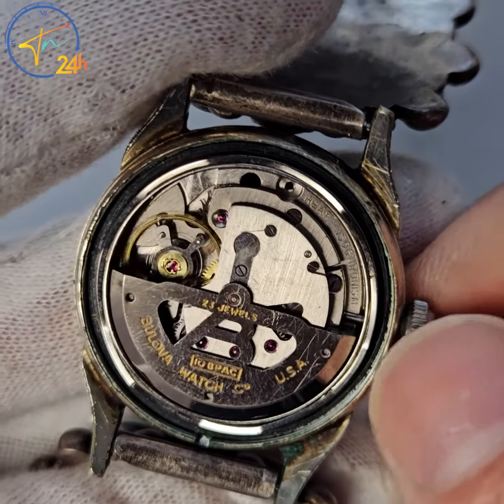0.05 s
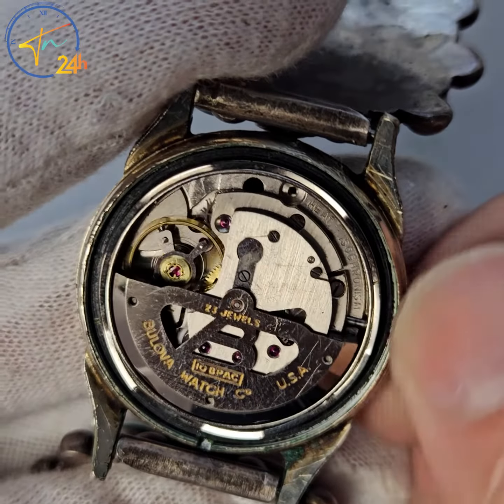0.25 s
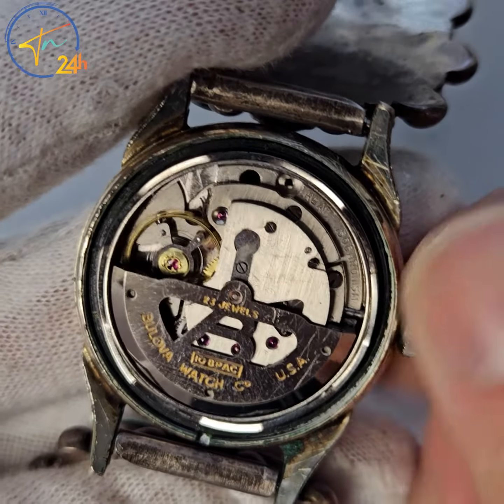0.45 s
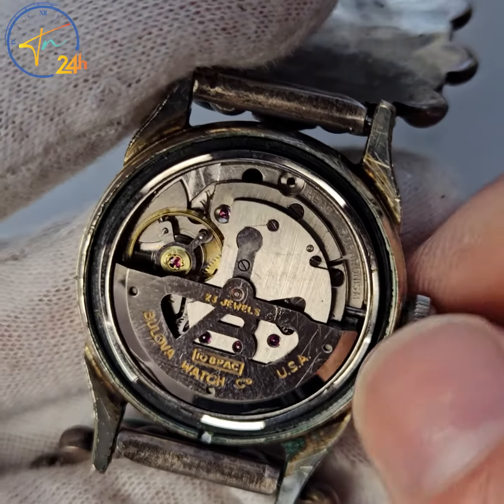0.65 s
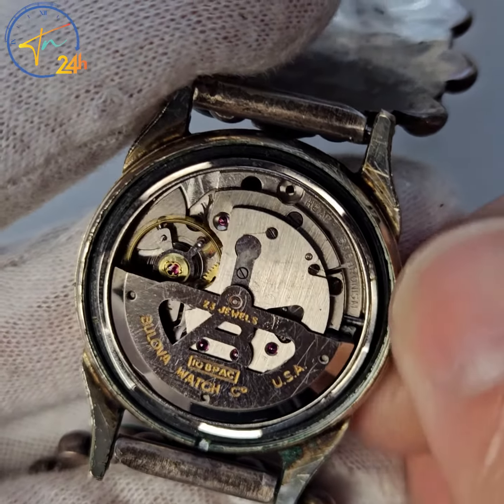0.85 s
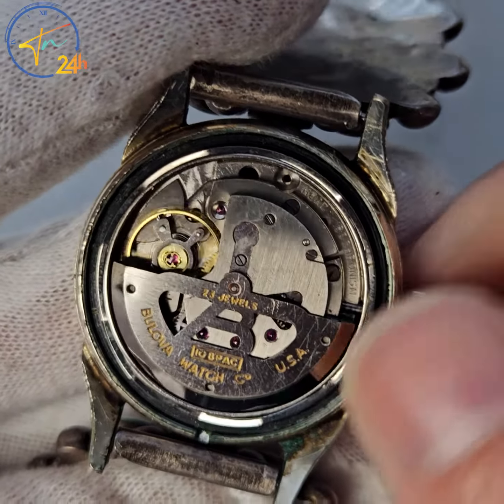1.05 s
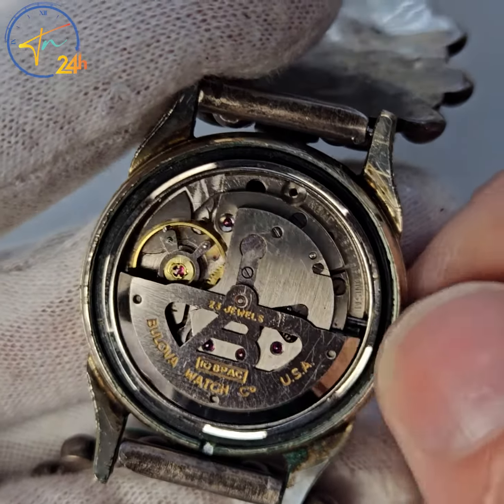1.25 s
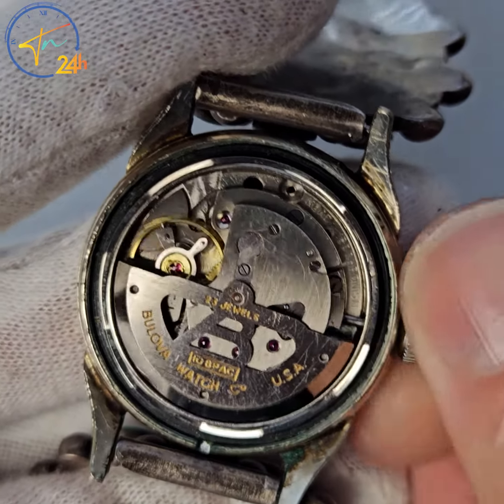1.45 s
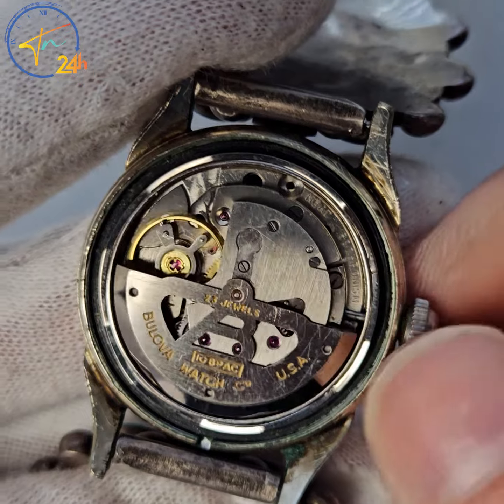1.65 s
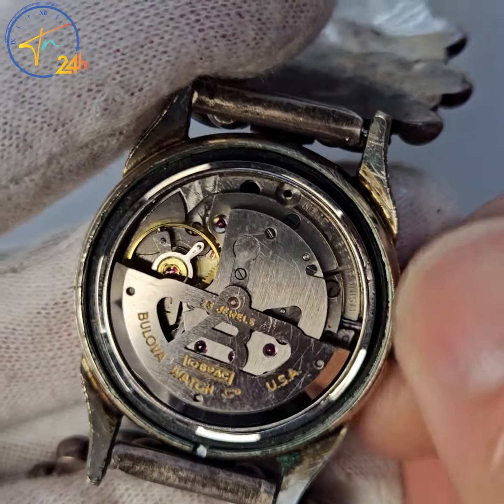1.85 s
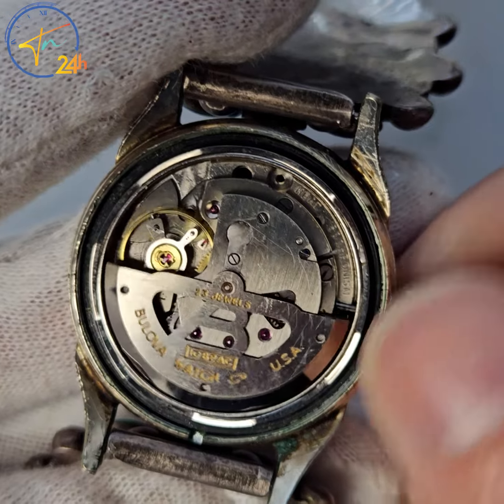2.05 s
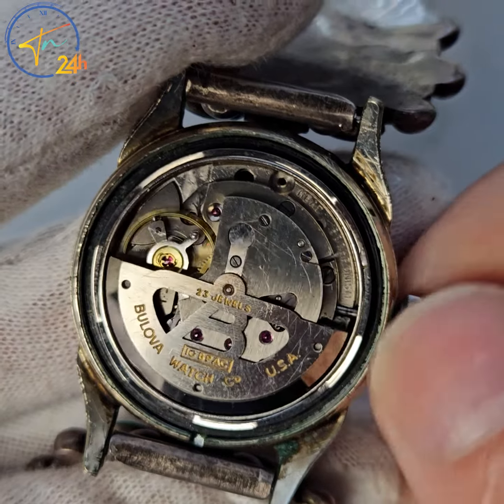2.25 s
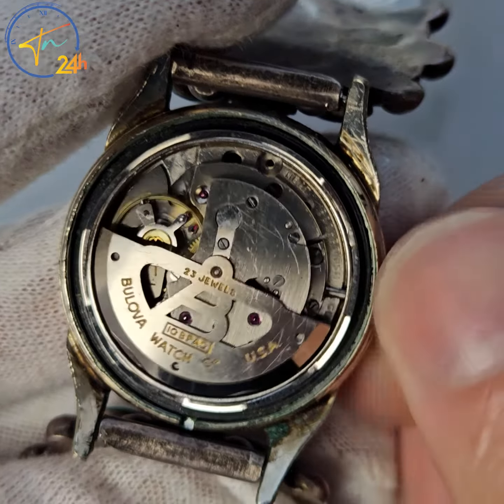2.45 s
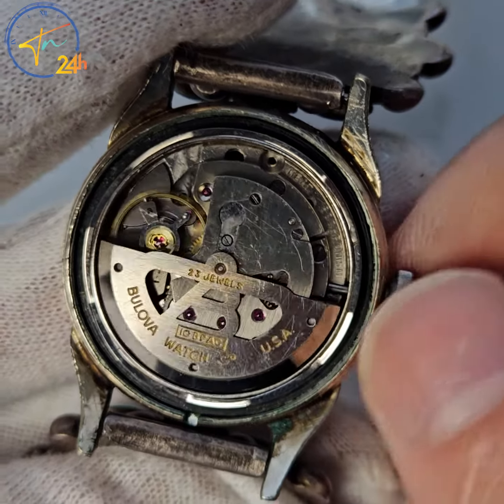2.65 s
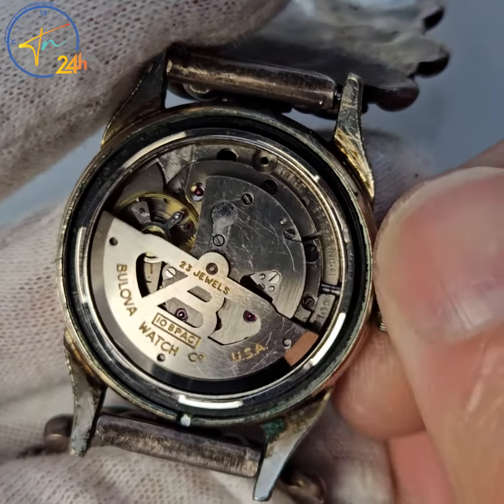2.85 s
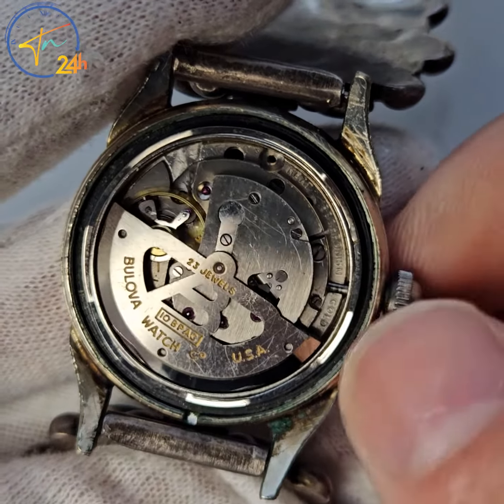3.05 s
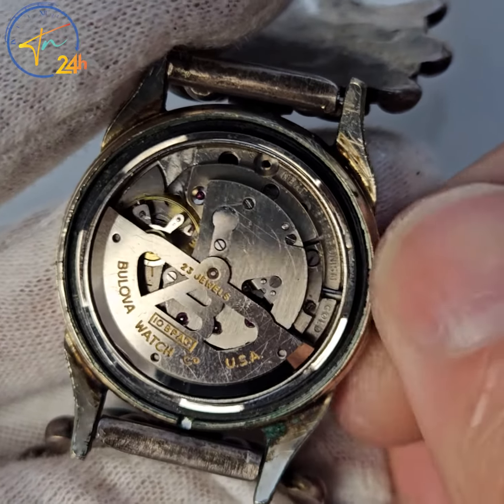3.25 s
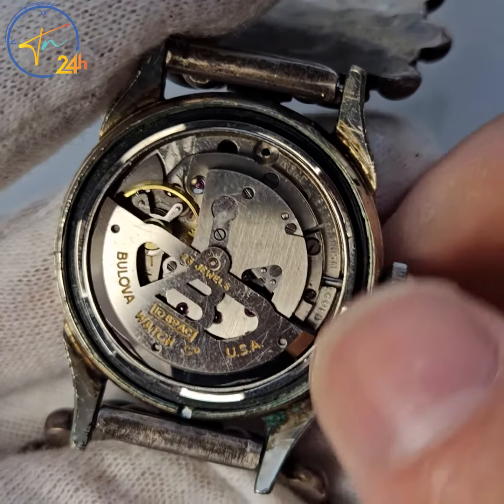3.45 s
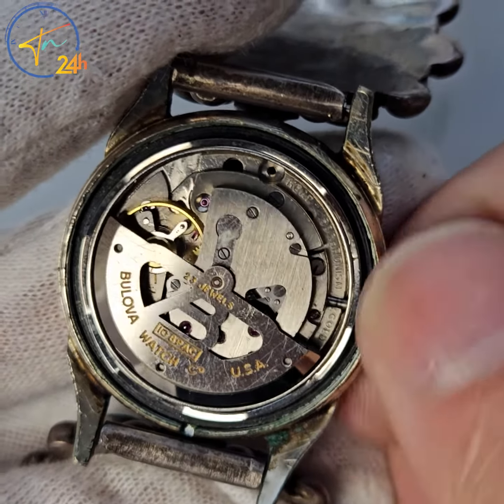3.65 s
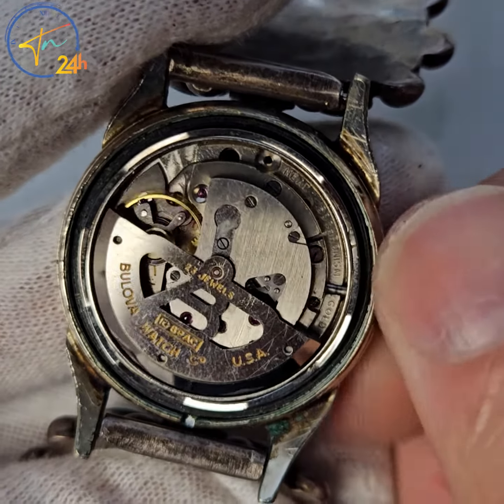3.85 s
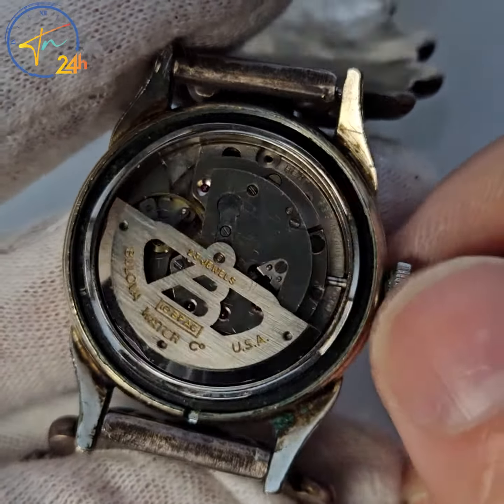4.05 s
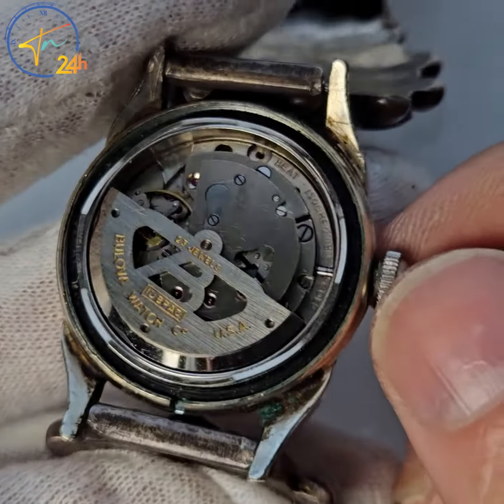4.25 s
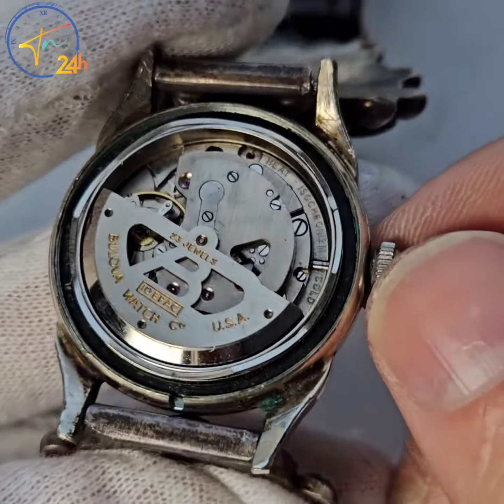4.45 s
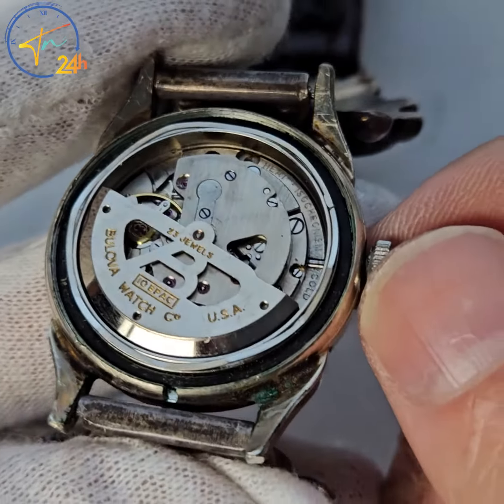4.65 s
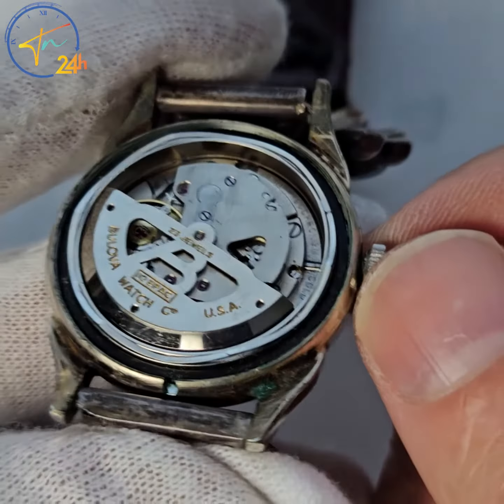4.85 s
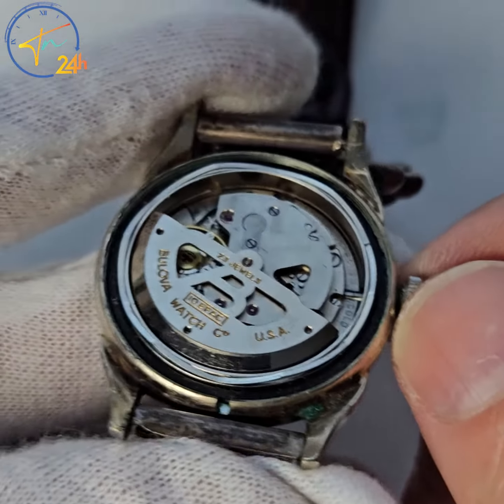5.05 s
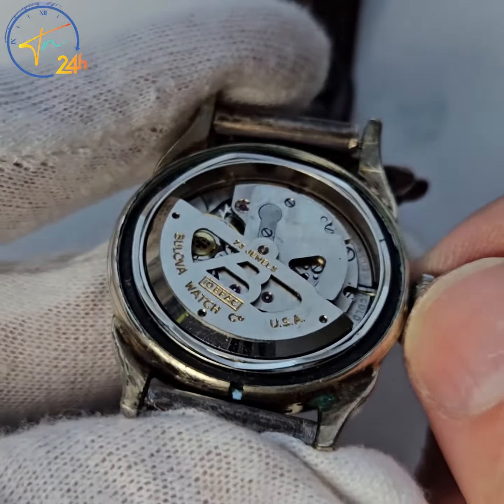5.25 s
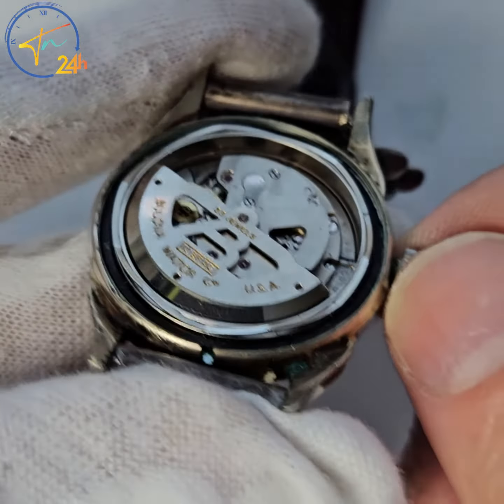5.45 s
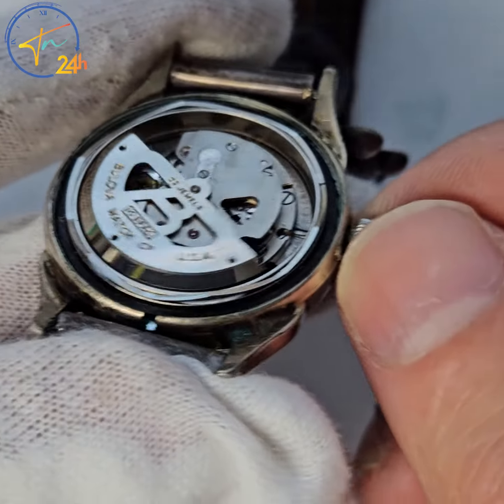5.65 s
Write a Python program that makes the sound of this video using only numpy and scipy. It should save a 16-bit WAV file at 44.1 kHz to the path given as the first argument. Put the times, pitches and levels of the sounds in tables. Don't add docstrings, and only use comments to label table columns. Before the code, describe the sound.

Close, dry and detailed stereo sound of a wristwatch being wound by hand in a small room. A firm metallic click at 0.02 s leads into a slower, grainy ratchet rasp until 0.3 s. Further click-and-rasp strokes start near 0.66, 1.18, 1.7, 2.2, 2.64, 3.09 and 3.55 s, each lasting around a fifth of a second, the buzz quickening and then slowing. The click at 1.18 is soft, the one at 1.7 dull; the strokes around 2.2 and 2.65 are loudest, the later ones brisker. Between them are faint skin friction, dull taps and sharp little metal slips. A weak last push ends by 3.76 s. Small touches and soft rustles fade after about 4.1 s, exposing very faint, fast high ticking that has run throughout, over a low rumble and wavering drone of distant machinery with light hiss. A tiny, very short click comes at 5.7 s.

```python
import sys
import numpy as np
from scipy import signal
from scipy.fft import rfft, irfft, next_fast_len
from scipy.io import wavfile
from scipy.ndimage import uniform_filter1d, map_coordinates

SR = 44100
rng = np.random.default_rng(int(sys.argv[2]) if len(sys.argv) > 2 else 0)


def store_pcm(level_fs):
    pcm = np.round(np.clip(level_fs, -1, 1) * 32767).astype(np.int16)
    wavfile.write(sys.argv[1], SR, np.atleast_2d(pcm).T)


def undo_db(level):
    steps = np.asarray(level, float) / 20
    return 10 ** steps


N = 251811
GRID = next_fast_len(N + 8192)
HZ = np.fft.rfftfreq(GRID, 1 / SR)

# start, fastest moment and end in s, top tooth rate in Hz, rasp there in dB.
STROKES = [
    (.093, 0.209, 0.31, 1840, -42),
    (0.685, 0.804, .882, 2533, -39.5),
    (1.2131, 1.329, 1.398, 2554, -40.5),
    (1.7288, 1.794, 1.908, 2653, -42.5),
    (2.215, 2.274, 2.37, 2630, -38.5),
    (2.652, 2.723, 2.82, 2701, -37.5),
    (3.11, 3.166, 3.261, 2993, -41.5),
    (3.568, 3.613, 3.662, 3132, -41),
    (3.654, 3.679, 3.756, 1245, -50),
]
# time in s, knock in dB, knock pitch in Hz, edge over knock in dB,
# thumb landing in dB.
SEATS = [
    (.0221, -33, 2380, 3, -81),
    (.6588, -33.5, 2475, -2, -64),
    (1.1836, -45.5, 2260, 2.5, -65.5),
    (1.7, -36.5, 2520, -10.5, -62),
    (2.1973, -33, 2279, -0.5, -55),
    (2.6417, -36, 2196, 3.5, -53.5),
    (3.0938, -36.5, 2303, 7.5, -56),
    (3.5507, -34.5, 2244, 0.5, -60.5),
]
# frequency in Hz, right port's lag in radians, right minus left in dB,
# scraping heard by one port only in dB.
PORT_PATH = [(2166, 1.6, -5.5, -2), (2640, 3.14, 0, -27), (2900, 3.14, 0, -27), (3230, 4, 0, -7),
             (3540, 3.14, 0, -25), (3730, 3.14, 0, -25), (4450, 6.86, -0.5, -1), (4570, 4.28, -2, -9),
             (5370, 7.6, -3.5, -15), (5907, 10, -14, 0), (8770, 7.1, -3.5, 1.5), (11070, 9.5, -2.5, -0.5),
             (12900, 12.43, -1, 0), (15690, 12.6, -2, 0)]
PATCH_DB = 2.45


def unit(x):
    return x / np.sqrt(np.mean(x ** 2) + 1e-20)


def along(points, column=1):
    rows = np.array(points)
    return np.interp(np.log(HZ + 1), np.log(rows[:, 0] + 1), rows[:, column])


def filtered(x, response):
    return irfft(rfft(x, GRID) * response, GRID)[..., :N]


def band(x, lo_hz, hi_hz, order=4):
    low_edge = 1 + (lo_hz / (HZ + 1)) ** (2 * order)
    high_edge = 1 + (HZ / hi_hz) ** (2 * order)
    return unit(filtered(x, 1 / np.sqrt(low_edge * high_edge)))


def wobble(rate):
    return map_coordinates(rng.standard_normal(1200), [np.arange(N) * rate / SR], mode="wrap")


def room():
    # frequency in Hz, level in dB per Hz.
    rumble = [(15, -58.5), (25, -29), (59, -15), (124, -6.5), (249, -12), (284, -11), (339, -14),
              (356, -18), (386, -19.5), (517, -34.5), (738, -39), (854, -49.5), (1200, -43), (1560, -76.5),
              (2640, -120)]
    air = [(530, -18.5), (900, 5), (1770, 0), (2090, 2), (9310, -10), (10600, -19.5), (12300, -14.5),
           (13400, -14), (16000, -32)]
    # time in s, thrum in dB.
    thrum_levels = [(0.0, -89.5), (0.16, -81), (1.88, -60.5), (2.19, -78), (2.91, -60.5), (3.08, -60),
                    (3.31, -54.5), (3.67, -78), (3.77, -57), (4.05, -72), (4.58, -63.5), (4.64, -54.5),
                    (5.18, -69.5), (5.34, -52.5), (5.53, -66.5), (5.71, -59)]
    # frequency in Hz, left-right likeness (0 to 1).
    likeness = [(60, 1), (130, 0.89), (290, 0.77), (640, 0.17), (1400, 0.055)]
    # frequency in Hz, left minus right in dB.
    lean = [(30, -9), (60, -11), (125, -4), (300, -2.5), (700, -1)]
    # time in s, level in dB, pitch in Hz.
    drone_swells = [(.11, -62, 132.7), (.37, -49.5, 136), (.47, -59.5, 137.5), (0.589, -57.5, 132),
                    (.69, -53.5, 126.1), (.83, -55, 124.6), (1.02, -51.5, 124.7), (1.1, -55.5, 125),
                    (1.281, -53.5, 135.6), (1.46, -56, 127.9), (1.621, -57, 123.6), (1.87, -53.5, 120),
                    (2.28, -57.5, 133.3), (2.39, -52, 122), (2.66, -54, 127.7), (2.85, -51.5, 127),
                    (3.09, -46.5, 125.9), (3.28, -49, 126), (3.52, -49.5, 122), (3.78, -56.5, 127.2),
                    (4.2, -57.5, 123.8), (4.39, -56, 118), (4.52, -59, 132), (4.9, -53, 119),
                    (5.03, -55.5, 122.9), (5.2, -64.5, 140.5), (5.37, -56, 126.2), (5.47, -52.5, 140.3),
                    (5.69, -58.5, 137.7)]
    swell_s, lull_db, wander_hz = 0.051, -70, 2.24
    murmur_db, murmur_follows = -63.5, 0.11

    turn = np.arccos(np.clip(along(likeness), -1, 1)) / 2
    mid, side = filtered(rng.standard_normal((2, N)), undo_db(along(rumble)) * [np.cos(turn), np.sin(turn)])
    lean_db = along(lean) / 2
    pair = filtered(np.array([mid + side, mid - side]), undo_db([lean_db, -lean_db]))

    t = np.arange(N) / SR
    thrum_db = np.interp(t, *np.transpose(thrum_levels))
    thrum = undo_db(thrum_db + 1.5 * wobble(9)) * band(pair, 45, 95)

    at, swell_db, swell_hz = np.transpose(drone_swells)
    drone_hz = np.interp(t, at, swell_hz) + wander_hz * wobble(7)
    swell = undo_db(lull_db) + sum(undo_db(db) * np.exp(-((t - s) / swell_s) ** 2) for s, db in zip(at, swell_db))
    port_phase = .15 * np.array([wobble(28), wobble(11)])
    phase = 2 * np.pi * np.cumsum(drone_hz + 5 * wobble(25)) / SR + port_phase
    port_db = np.array([[-1.3], [1.3]])
    drone = swell * undo_db(3.9 * wobble(30) + port_db) * np.sin(phase)
    drone = drone + undo_db(-67.5) * band(pair, 120, 130)

    murmur_db = murmur_db + murmur_follows * (thrum_db - thrum_db.mean())
    murmur = undo_db(murmur_db + 2.4 * wobble(9.4)) * band(pair, 190, 2500)
    hiss = undo_db(-85) * unit(filtered(rng.standard_normal((2, N)), undo_db(along(air))))
    return thrum + drone + murmur + hiss


def escapement():
    # time after its start in s, level in dB, pitch in Hz, t60 in s.
    ticks = [
        (.185, -78, 8640, 0.11),
        (.215, -84, 9000, 0.029),
        (0.284, -77, 8700, 0.077),
        (.348, -86, 11300, .06),
        (.383, -75, 9500, 0.14),
        (.414, -80.5, 9700, .06),
        (0.49, -82, 13400, 0.14),
        (0.546, -78.5, 11570, 0.072),
    ]
    # frequency in Hz, level in dB.
    plate_modes = [(6600, -16), (7500, -8.5), (8100, -12), (10200, -9.5), (11600, -8.5), (12500, -11)]
    swing_s = .3993

    out, t = np.zeros((2, N + 2 * SR)), np.arange(2200) / SR
    plate_hz, plate_db = np.transpose(plate_modes)[:, :, None]
    onset = 1 - undo_db(-60 * t / .012)
    for turn in range(15):
        for s, db, hz, t60 in ticks:
            drift = .2 * np.cumsum(rng.standard_normal((8, len(t))), axis=1)
            mode_db = plate_db + 2.2 * rng.standard_normal((6, 1))
            plate = undo_db(mode_db) * np.sin(2 * np.pi * plate_hz * t + drift[2:])
            ring = np.sin(2 * np.pi * hz * t + drift[:2])
            scratch = 0.36 * rng.standard_normal(len(t)) * undo_db(-60 * t / .01)
            level = undo_db(db + 2.3 * rng.standard_normal() - 60 * t / t60)
            first = max(round((s + .007 + (turn - 1) * swing_s) * SR), 0)
            out[:, first:first + len(t)] += level * (ring + plate.sum(0) + scratch) * onset
    return out[:, :N] * undo_db([[-14], [-23]])


def thumb():
    # first speed over top speed, hold of the speed against the spring (exponent),
    # last tooth rate in Hz, treble over rasp in dB.
    grips = [(.3, 1.9, 560, 0.5), (.27, 1.6, 585, -1), (.28, 1.6, 610, 1), (.37, 2.1, 570, 0.7),
             (.38, 1.2, 600, -2.5), (.4, 1.1, 630, -2.1), (.31, 0.98, 650, 3.5), (.3, 1.1, 1300, 3),
             (0.96, 2.4, 850, 1)]
    push = 1.3
    louder, sizzle_slow = 1.466, 0.072

    t = np.arange(N) / SR
    rate_hz, rasp_db = np.full(N, 600.), np.full(N, -60.)
    sizzle_db, gate = np.zeros(N), np.zeros(N)
    for (start, crest, end, top_hz, top_db), (first, hold, end_hz, treble_db) in zip(STROKES, grips):
        now = slice(round((start - .003) * SR), round((end + .003) * SR))
        rise = np.clip((t[now] - start) / (crest - start), 0, 1)
        fall = np.clip((t[now] - crest) / (end - crest), 0, 1)
        driven_hz = top_hz * (first + (1 - first) * rise ** push)
        rate_hz[now] = driven_hz - (top_hz - end_hz) * fall ** hold
        speed_db = 20 * np.log10(rate_hz[now] / top_hz)
        rasp_db[now] = top_db + louder * speed_db
        sizzle_db[now] = treble_db - sizzle_slow * speed_db
        gate[(t >= start) & (t <= end)] = 1
    return rate_hz, rasp_db, sizzle_db, uniform_filter1d(gate, size=130)


def ports(shared, own):
    # frequency in Hz, level in dB.
    case_colour = [(900, -44.5), (1600, -25), (2100, -6), (3000, 4), (3550, -1.5), (4250, -2), (4650, -6.5),
                   (5250, -2.5), (6150, -8), (6500, -12), (6800, -30), (7080, -17), (7500, -17.5),
                   (9000, -16.5), (11200, -8), (12700, -2.5), (15600, 0)]
    cepstrum = irfft(np.log(undo_db(along(case_colour))), GRID)
    cepstrum[1:GRID // 2] *= 2
    cepstrum[GRID // 2 + 1:] = 0
    left = np.exp(rfft(cepstrum)) * (HZ < 15850)
    right = left * undo_db(along(PORT_PATH, column=2)) * np.exp(-1j * along(PORT_PATH))
    source = rfft(shared, GRID) + rfft(own, GRID) * undo_db(along(PORT_PATH, column=3))
    return irfft(np.array([left, right]) * source, GRID)[:, :N]


def patchy(x, depth_db, shaded=False):
    # level in dB near each of shade_hz, then level in dB of what the ports share
    # near hollow_hz.
    shades = [(2, 1, 1, 1.5, 1), (-1, -3, -1, 1, 1), (1.5, -0.5, 1, 0, -0.5), (-3.5, 0, -1, 0.88, -5),
              (-3.5, -1, -1, -1, -1), (-2.6, 1.1, 0.1, 1, -4.5), (-4.5, 2, -0.38, -0.36, -2),
              (-1.7, 1, -1.5, 0.1, -1), (-1.1, 1, 1.2, -1, -4)]
    shade_hz, shade_wide_hz = [2100, 3080, 4300, 5900], 450
    hollow_hz, hollow_wide_hz = 3150, 350

    hz, t, z = signal.stft(x, SR, nperseg=256)
    field = uniform_filter1d(rng.standard_normal(z.shape[1:]), size=4, axis=0)
    field = uniform_filter1d(field, size=9, axis=1)
    z = z * undo_db(depth_db * unit(field))
    if shaded:
        starts = [row[0] - .006 for row in STROKES]
        stroke = np.clip(np.searchsorted(starts, t) - 1, 0, None)
        *shade_db, cancel_db = np.transpose(shades)[:, stroke]
        z = z * undo_db(np.exp(-((hz[:, None] - shade_hz) / shade_wide_hz) ** 2) @ shade_db)
        alike = (z[0] + z[1]) / 2
        hollow = np.exp(-((hz[:, None] - hollow_hz) / hollow_wide_hz) ** 4)
        z = z + alike * (undo_db(hollow * cancel_db) - 1)
    return signal.istft(z, SR, nperseg=256)[1][:, :N]


def sliding():
    # firmest moment in s, rub in dB, fade in dB per s, hiss over rub in dB.
    slides = [(.01, -74.5, 144, -13), (.392, -68, 185, -7.5), (0.902, -65.5, 163, -9),
              (1.07, -92, 122, -28), (1.469, -58.5, 259, -21), (1.9, -64.5, 111, -21),
              (2.44, -65.5, 149, -5), (2.83, -68.5, 158, -28), (2.93, -72, 212, -35),
              (3.329, -68.5, 177, -14), (3.77, -69.5, 164, -15), (3.9, -78, 104, -35), (4.1, -99, 151, -38)]
    settle_db_per_s, hiss_fade = 55.5, 0.88

    grit = undo_db(3 * wobble(220) + 1.3 * wobble(45))
    heard = ports(grit * rng.standard_normal(N), 2 * grit * rng.standard_normal((2, N)))
    heard = heard + 0.085 * grit * rng.standard_normal((2, N))
    heard = patchy(heard, PATCH_DB)
    rub, hiss = band(heard, 1300, 6900, order=2), band(heard, 6900, 17000)

    t = np.arange(N) / SR
    landing = sum(undo_db(db) * np.exp(-((t - s + 0.0026) / 0.013) ** 2) for s, *_, db in SEATS)
    rubbing, hissing = np.zeros(N), np.zeros(N)
    for s, db, fade, hiss_db in slides:
        loss_db = np.where(t < s, settle_db_per_s * (s - t), fade * (t - s))
        on = t > s - .09
        rubbing += on * undo_db(db + 2.5 - loss_db)
        hissing += on * undo_db(db + hiss_db - hiss_fade * loss_db)
    *_, gate = thumb()
    return (1 - gate) * (rubbing * rub + hissing * hiss) + landing * (rub + 0.16 * hiss)


def clicks():
    # frequency in Hz, level in dB, t60 in s.
    stem_modes = [(4440, -8.5, 0.01), (4635, 7, 0.0028), (5600, -12.5, 0.008), (5800, -19, 0.025)]
    # time in s, knock in dB, knock pitch in Hz, edge over knock in dB.
    taps = [(.3924, -65.5, 2100, -12), (.6683, -47, 2268, -21.5), (1.0795, -44.5, 2213, -13),
            (1.4366, -50, 2436, -6), (1.4621, -47, 2440, -10), (1.4728, -54, 2180, -12),
            (1.5918, -63.5, 1667, -4), (1.6545, -65.5, 3002, -3), (1.9643, -55.5, 2503, -13),
            (2.0827, -44.5, 2317, -22), (2.1908, -50, 2335, -8.5), (2.2043, -40, 2200, -14),
            (2.4924, -59.5, 3000, -9), (2.8646, -66, 2207, -3.5), (2.9424, -61, 2340, -6.5),
            (3.017, -62.5, 2330, -20), (3.8416, -61, 3260, -18.5), (3.9495, -59.5, 3240, -30),
            (4.0507, -65, 2300, -22), (4.0904, -62.5, 1900, -20), (4.125, -53.5, 3130, -38),
            (1.09, -56.5, 2210, -20.5), (5.677, -73.5, 2220, -20)]
    # time in s, snap in dB, ring over snap in dB, ring pitch in Hz.
    snaps = [(.0835, -50, -3.5, 5000), (.0885, -45, 11, 5000), (0.2929, -43, -11.5, 5200),
             (.319, -45, 2, 4400), (.3676, -51, 2, 4300), (.41, -60.5, 7, 5600), (.4509, -61.5, -23, 4530),
             (.487, -67, -20, 4600), (.6953, -40.5, 0, 4600), (.723, -41, -5, 4400), (.745, -45, -1, 4400),
             (.8756, -51.5, 1.5, 4300), (.9348, -49.5, 5, 4900), (.9385, -52, 4, 5300),
             (1.0661, -66, -1, 4600), (1.1604, -68.5, -4, 5800), (1.218, -43.5, 2.5, 5100),
             (1.4471, -48, 4, 4300), (1.4488, -46.5, 5.5, 4300), (1.4897, -47.5, 3, 4300),
             (1.682, -66.5, 3, 5000), (1.7335, -56.5, 2, 4400), (1.939, -52.5, -0.5, 4500),
             (2.347, -43.5, -6.5, 4400), (2.4195, -41, 3, 5200), (2.4666, -41.5, 9.5, 5500),
             (2.6255, -49, -15, 4600), (2.8111, -41.5, -11.5, 4300), (2.9, -58.5, -20, 4600),
             (3.0823, -59.5, 0, 4600), (3.2165, -41.5, -12.5, 4400), (3.249, -39.5, -8.5, 4300),
             (3.3206, -56.5, 1, 4300), (3.3625, -66, 5, 5000), (3.542, -46, -8, 4580),
             (3.8098, -57, 6, 4300), (5.6985, -71.5, 19, 5300)]
    stem_hz = 4600
    seat_ring_db, tap_ring_db = 9, 4
    slip_knock_db, slip_knock_hz = -20, 3000

    # time, knock dB, knock Hz, ring dB, snap dB, ring Hz.
    blows = []
    for s, db, hz, edge, _ in SEATS:
        blows.append((s, db, hz, db + edge + seat_ring_db / 2, db + edge - seat_ring_db / 2, stem_hz))
    for s, db, hz, edge in taps:
        blows.append((s, db, hz, db + edge, db + edge - tap_ring_db, stem_hz))
    for s, db, ring, hz in snaps:
        blows.append((s, db + slip_knock_db, slip_knock_hz, db + ring, db, hz))

    out, t = np.zeros(N + SR), np.arange(1500) / SR
    rise = 1 - np.exp(-t / .0007)
    knock_shape = undo_db(-60 * t / 0.013) * (1 - undo_db(-60 * t / .002))
    for s, knock_db, knock_hz, ring_db, snap_db, ring_hz in blows:
        second_hz = (1.4 if knock_hz < 2700 else .71) * knock_hz
        tones = np.sin(2 * np.pi * knock_hz * t) + .5 * np.sin(2 * np.pi * second_hz * t)
        knock = undo_db(knock_db + 9.5) * knock_shape * tones
        ring = np.zeros(len(t))
        for hz, db, t60 in stem_modes:
            chance_db, phase = rng.standard_normal(2) * [1.2, 3]
            level = undo_db(ring_db + db + chance_db - 60 * t / t60)
            ring += level * np.sin(2 * np.pi * hz * ring_hz / stem_hz * t + phase)
        grain = np.diff(rng.standard_normal(len(t)), 2, prepend=[0, 0])
        snap = undo_db(snap_db - 1.5 - 60 * t / 0.008) * grain
        out[round(s * SR):][:len(t)] += knock + undo_db(2.5) * ring * rise + snap
    lag = np.exp(-1j * along(PORT_PATH))
    low_cut = 1 + (1600 / (HZ + 1)) ** 6
    return filtered(out[:N], np.array([lag ** 0, lag * undo_db(-2.5)]) / low_cut)


def winding():
    bed = .35
    rate_hz, rasp_db, sizzle_db, gate = thumb()
    passed = np.cumsum(gate * rate_hz * (1 + .028 * wobble(220))) / SR
    teeth = np.arange(1, 6000)
    chance = rng.standard_normal((len(teeth), 2))
    at = np.interp(teeth + .05 * chance[:, 0], passed, np.arange(N))

    near = at.astype(int)[:, None] + np.arange(-7, 9)
    away = near - at[:, None]
    kernel = np.sinc(away) * np.cos(away * np.pi / 16) ** 2
    strength = undo_db(2.1 * np.clip(chance[:, 1:], -3, 1.6)) * (at < N - 1)[:, None]
    blows = np.bincount(np.clip(near, 0, N - 1).ravel(), (kernel * strength).ravel(), N)
    blows = blows / np.sqrt(rate_hz / SR)

    burst = np.sqrt(abs(signal.lfilter([.12], [1, -.88], blows ** 2)) + bed ** 2)
    scrape = burst * rng.standard_normal((3, N))
    uneven = undo_db(.8 * wobble(90))
    shared = blows * undo_db(1.1 * wobble(160)) + .55 * scrape[0]
    heard = patchy(ports(uneven * shared, uneven * scrape[1:]), PATCH_DB, shaded=True)
    rasp = band(heard, 300, 6900)
    sizzle = undo_db(sizzle_db) * band(heard, 6320, 11000)
    duty = np.sqrt(np.mean(gate))
    return duty * gate * undo_db(rasp_db + 4.5) * (rasp + sizzle)


def stirrings():
    # time in s, level in dB, centre in Hz, spread in Hz, length in s.
    stirs = [(1.1, -75, 3000, 1200, 0.044), (1.101, -76, 8000, 1500, 0.027),
             (1.182, -71, 4600, 250, 0.0045), (1.474, -62, 1489, 250, 0.0091),
             (2.657, -68, 1200, 150.3, .015), (3.07, -61, 300, 202.4, 0.062), (1.461, -70, 400, 250, 0.035),
             (4.019, -75, 480, 80.7, 0.11), (2.899, -85, 602, 46.4, 0.068),
             (3.298, -84.5, 736, 25.05, 0.25), (3.602, -65, 1990, 220, 0.07),
             (3.926, -74.5, 5260, 260, 0.021), (3.957, -77, 2890, 558, 0.044),
             (4.119, -75, 2200, 420, 0.046), (4.127, -63, 6470, 270, 0.0024), (4.133, -70, 3150, 150, .014),
             (4.31, -90, 2048, 100, 0.018), (4.491, -82.5, 7620, 250, .005),
             (4.492, -80, 12300, 700, 0.0062), (4.493, -84, 14000, 400, .005), (4.56, -87, 4600, 90, 0.038),
             (4.582, -81, 4650, 1604, 0.037), (4.589, -79, 8900, 2190, 0.021),
             (4.615, -79, 13000, 2000, .003), (4.685, -88.5, 2100, 110, 0.014),
             (4.918, -79, 5270, 199.6, 0.019), (4.933, -83.5, 3500, 800, 0.031),
             (5.12, -84.5, 4440, 90, .03), (5.183, -83.5, 5200, 300, .004), (5.287, -83, 2080, 130, .015),
             (5.409, -79.5, 600, 36, .11), (5.512, -87, 4500, 120, 0.016), (5.57, -86, 8800, 149, .01),
             (5.692, -73, 12900, 1198, .002), (5.695, -76, 5100, 1490, 0.015),
             (5.7, -48.5, 5550, 900, 0.00099)]
    out, t = np.zeros((2, N + SR)), np.arange(-SR // 4, SR // 4) / SR
    puff_hz = np.fft.rfftfreq(len(t), 1 / SR)
    for s, db, hz, spread_hz, length in stirs:
        spectrum = rfft(rng.standard_normal((2, len(t))))
        puff = irfft(spectrum * np.exp(-((puff_hz - hz) / spread_hz) ** 2))
        first = round(s * SR - len(t) / 2)
        out[:, first:][:, :len(t)] += undo_db(db) * unit(puff) * np.exp(-(t / length) ** 2)
    return out[:, :N]


def walls(x, t60=0.31):
    t = np.arange(SR // 4) / SR
    tail = rng.standard_normal((2, len(t))) * undo_db(-60 * t / t60) * (t > .003)
    tail = signal.lfilter([1], [1, -.6], tail)
    return signal.fftconvolve(x, tail / np.linalg.norm(tail[0]), axes=1)[:, :N]


def scene():
    watch = winding() + clicks() + undo_db(14.5) * escapement()
    return watch + undo_db(-30) * walls(watch) + sliding() + stirrings() + room()


def top_cut(x):
    return signal.sosfilt(signal.butter(12, 16990, fs=SR, output="sos"), x)


def record(dry):
    limited = filtered(dry, undo_db(-10 * (HZ > 15900)) * (HZ < 16900))
    return top_cut(limited)


dry = scene()
out = record(dry)
store_pcm(out)
```